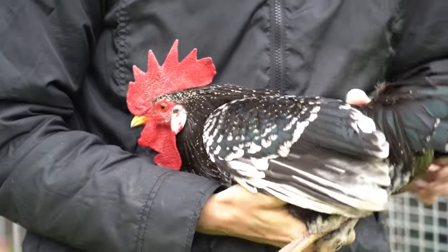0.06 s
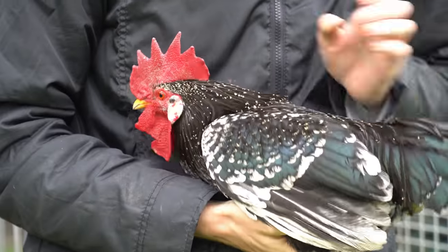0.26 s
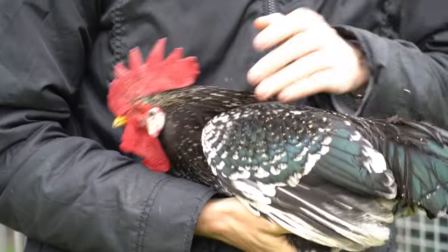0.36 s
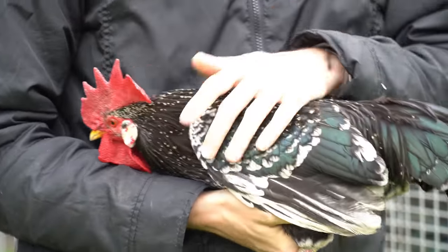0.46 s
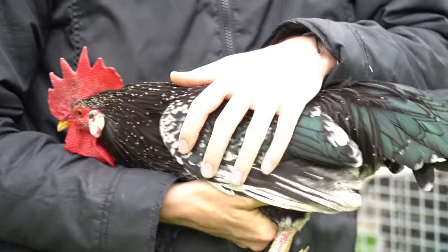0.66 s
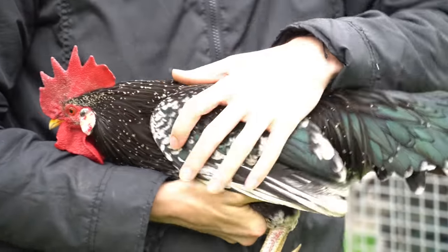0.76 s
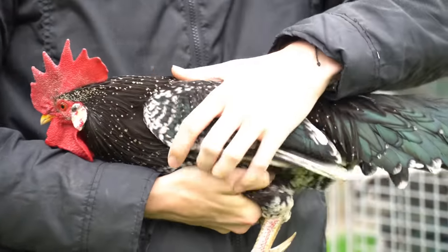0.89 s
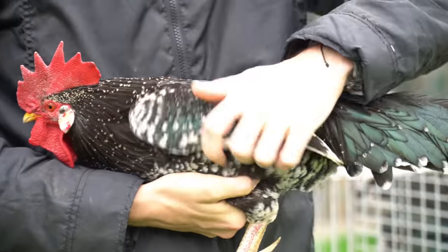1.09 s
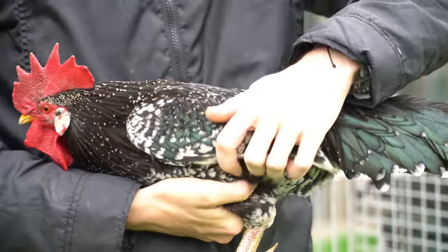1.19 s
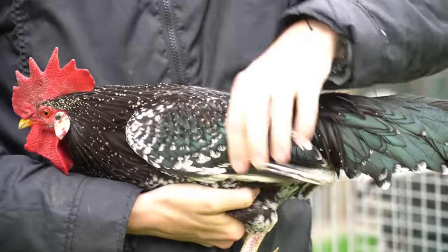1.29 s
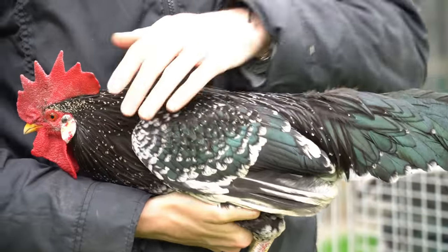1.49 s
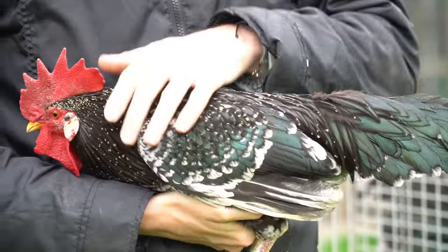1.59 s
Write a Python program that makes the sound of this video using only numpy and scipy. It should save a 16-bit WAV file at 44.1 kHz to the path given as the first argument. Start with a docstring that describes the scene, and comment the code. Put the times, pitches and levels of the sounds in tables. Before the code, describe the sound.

A held rooster crows once, close by: hoarse and quavering, then a clear falling whistle and gulp

```python
"""In a yard, a rooster crows once, close by on the left: a hoarse quavering first half, a clear falling
whistle, a few cracks along the way, and a gulp. Stacked sine overtones make the clear voice, irregular
pulses through throat resonances make the rasp, and short low sines the gulp. Fading noise echoes the crow.
The yard still rings from an earlier call (noise and a sine). A jacket rustles (noise), a hand pats feathers
(fading sines), small dry ticks sound (noise bursts) and faint air hisses behind it all."""
import sys
import numpy as np
from scipy import signal
from scipy.fft import rfft, irfft, next_fast_len
from scipy.io import wavfile
from scipy.ndimage import map_coordinates

SR = 44100
rng = np.random.default_rng(int(sys.argv[2]) if len(sys.argv) > 2 else 0)


def inscribe(sig):
    """Save sig as 16-bit PCM at rate SR to the path in sys.argv[1].

    A 1-D sig is mono; a 2-D sig holds one channel per row.
    Samples are clipped to [-1, 1] before scaling.
    """
    pcm = np.round(np.clip(np.atleast_2d(sig).T, -1, 1) * 32767)
    wavfile.write(sys.argv[1], SR, pcm.astype(np.int16))


N = 72765
T = np.arange(N) / SR

# The path of the crow, before quaver and cracks. Each row: time in seconds, pitch in Hz, quaver depth in Hz,
# tone in dB, rasp in dB, timbre (0 hoarse, 1 open, 2 pure; held at these ends), left over right in dB.
CROW_PATH = [(.188, 1295, 2.5, -52, -52, 0.08, 7), (.198, 1126, -4, -17.5, -21.5, 0.08, 13),
             (.225, 1091, 16.5, -21, -14.5, -0.5, 11.5), (.24, 1075, -15, -17.5, -19.5, 0.08, 15),
             (.252, 1107, 42, -16.5, -17.5, 0, 11), (.26, 1101, 19, -13, -27.5, -0.4, 11),
             (.32, 1107, 28, -14.5, -26, -0.5, 11.5), (.33, 1097, 8, -19, -15.5, -2, 11),
             (.37, 1099, -3, -17.5, -15.5, 0.08, 14.5), (.38, 1102, 27, -13, -26, 0, 13),
             (.415, 1169, 57, -11.5, -36, 0, 9.5), (.45, 1236, 75.5, -13, -27.5, 0.08, 14.5),
             (.54, 1242, 26.5, -13.5, -33, 0.2, 12), (.575, 1223, 95, -12.5, -25, 0.08, 15),
             (.6, 1147, 57, -12.5, -34, -0.2, 10.5), (.65, 1173, 86, -11, -26, 0.08, 12),
             (.68, 1129, 48, -12.5, -24.5, 0.1, 11.5), (.75, 1064, 69.5, -15, -26, 0, 13.5),
             (.8, 1024, 57, -19.5, -20.5, -0.9, 14.5), (.86, 1004, 4.5, -32, -18.5, 0.17, 15),
             (.884, 1012, 0, -27, -17, 0.8, 12), (.895, 1036, -0.5, -13.5, -24, 1.5, 13.5),
             (.93, 1043, -8.5, -10, -42.5, 1.23, 41), (.96, 1064, 0, -19.5, -38.5, 0.9, 15),
             (1.0, 1108, 4, -14.5, -43.5, 0.9, 15), (1.078, 1133, 1.5, -14.5, -41, 1, 9.5),
             (1.126, 1135, 3.5, -17, -32.5, 1.46, 12.5), (1.156, 1044, -0.5, -11, -44.5, 1.8, 15),
             (1.176, 1077, 5.5, -21.5, -32.5, 1, 7), (1.2, 1033, -1, -8.5, -40.5, 2.1, 16.5),
             (1.29, 1007, -1, -6.5, -52, 2.5, 15), (1.335, 988, 0, -8.5, -50, 2.05, 16),
             (1.38, 972, 0, -4.5, -46, 1.95, 15), (1.39, 950, 0, -10.5, -41, 1.92, 22),
             (1.405, 936.7, 0.5, -10.5, -27.5, 1.85, 19), (1.418, 930, 5.5, -14.5, -20, 1.75, 15.5),
             (1.425, 968, 15.5, -27.5, -39.5, 1.2, 4.5), (1.44, 869, -7, -35, -33, 0.6, 48),
             (1.45, 888, -3, -53.5, -60.5, -1.8, 43)]
# The tops of the quaver. Each entry: time in seconds.
QUAVER_TOPS = [.21, .235, .257, .279, .301, .322, .345, .375, .402, .425, .449, .473, .498, .526, .549,
               .573, .597, .621, .648, .676, .706, .742, .78, .815, .85]
# Cracks in the voice. Each row: time in seconds, added rasp in dB, pitch drop in Hz, tone dip in dB.
VOICE_CRACKS = [(0.482, -17.5, 2, 2.5), (0.515, -19.5, -0.5, 1), (0.661, -23, -1.5, 10),
                (0.691, -24.5, 6.5, 14.5), (0.73, -20.5, -0.5, 13), (0.766, -24.5, -3.5, 20),
                (1.021, -20, 43.5, 5), (1.04, -20.5, 32, 3.5), (1.082, -19, 72, 7),
                (1.129, -18.5, 42.5, 3.5)]
# Overtones of the three timbres. Each row: multiple of the pitch, relative level in dB.
HOARSE_OVERTONES = [(1, -8.5), (2, 1), (3, -20), (4, -11), (5, -14), (6, -15.5), (7, -20), (8, -40.5),
                    (9, -36)]
OPEN_OVERTONES = [(1, -15), (2, 0.5), (3, -26.5), (4, -25), (5, -29), (6, -46), (7, -54.5), (8, -50),
                  (9, -62.5), (10, -24.5), (11, -29), (12, -34), (13, -40), (14, -42)]
PURE_OVERTONES = [(1, -26), (2, -4), (3, -38), (4, -30), (5, -63), (6, -56.5), (7, -44.5), (8, -61),
                  (9, -61.5), (10, -50.5), (11, -45.5), (12, -39.5), (13, -35), (14, -47)]
LOST_DB = -42  # the hoarse voice loses its top overtones
HOARSE_ALL = HOARSE_OVERTONES + [(k, LOST_DB) for k, _ in OPEN_OVERTONES[len(HOARSE_OVERTONES):]]
# Fixed resonances that lift a passing overtone. Each row: centre in Hz, width in Hz, lift in dB.
OVERTONE_LIFTS = [(2750, 150, 4), (4400, 280, 9), (6900, 180, 7), (7750, 220, 10), (11200, 300, 8),
                  (12500, 300, 6)]
# Throat resonances of the rasp. Each row: centre in Hz, width in Hz, relative level in dB.
EARLY_THROAT = [(1033, 150, -1.5), (1940, 460, -2), (2207, 43.7, 13), (2740, 234, -0.5), (4270, 84, -2.5),
                (4650, 135, 1.5), (5440, 750, -7), (7740, 400, -3.5), (11300, 2000, -22.5),
                (13900, 1400, -33.5)]
LATE_THROAT = [(818, 104, 1.5), (1645, 360, -4), (2042, 140, 7), (2730, 170, 2.5), (4237, 65, 5),
               (4480, 270, -5.5), (6850, 390, -9), (12280, 670, -16.5)]
OPEN_THROAT = [(736.3, 74, -2), (1129, 47, 5), (1750, 240, 4.5), (2757, 68, 11), (3990, 90, -3.5),
               (12060, 670, -5.5)]
# Frequencies where the early, late and open rasp is faint. Each row: centre in Hz, width in Hz.
RASP_GAPS = [(9340, 1230), (9300, 3600), (8080, 9000)]
# When the throat changes, early to late and late to open. Each entry: time in seconds.
THROAT_TIMES = [.6, .8, .89, .93]
# Low grunts at the end. Each row: time in seconds, pitch in Hz, peak in dB, half length in seconds.
GULP_GRUNTS = [(1.414, 1169, -22, 0.003), (1.416, 785.6, -13.5, 0.0023), (1.43, 763, -21.5, 0.0052)]
# Tone colour on the right, added to the pan. Each row: frequency in Hz, level in dB.
RIGHT_TONE = [(300, 10), (700, 8.5), (1300, -1), (2200, 3.5), (5000, 0.5), (9000, 5), (14000, 12)]
# How far the left is ahead of the right. Each row: frequency in Hz, phase lead in radians.
LEFT_AHEAD = [(0, -4.5), (1210, 0.5), (2580, 10.5), (5000, 15), (8180, 17.5), (10700, 20), (15500, 19)]
# Echo of the yard. Each row: frequency in Hz, time to fall by 60 dB in seconds.
YARD_FADES = [(300, 0.41), (1000, 0.62), (2000, 0.77), (5000, 0.82), (12000, 0.14)]
# Loudness of the jacket rustle, before it flutters. Each row: time in seconds, level in dB.
RUSTLE_LEVEL = [(0, -49.5), (.17, -51), (.215, -38.5), (.29, -39), (.4, -45.5), (.45, -70), (1.65, -57.5)]
# Tone colour of the jacket cloth. Each row: frequency in Hz, relative level in dB per Hz.
CLOTH_TONE = [(30, -13), (110, -10), (250, -6.5), (450, 2.5), (800, -1.5), (3000, -2.5), (15000, -44.5)]
# Soft pats on feathers. Each row: start in seconds, pitch in Hz, level in dB before the fade.
FEATHER_PATS = [(.05, 278, -33.5), (.97, 300, -46), (1.477, 825, -31.5), (1.478, 266, -32)]
# Small dry ticks. Each row: start in seconds, centre in Hz, level in dB before the fade.
DRY_TICKS = [(0.233, 9150, -27.5), (1.463, 5500, -37), (1.565, 3820, -45)]
# Ringing of the earlier call. Each row: centre in Hz, width in Hz, relative level in dB.
EARLIER_RING = [(1010, 30, 1), (1740, 120, 0), (2066, 65, 5.5), (2850, 360, -5.5), (4500, 340, -14),
                (807, 67, -1.5)]
# Tone colour of the air. Each row: frequency in Hz, relative level in dB per Hz.
AIR_TONE = [(25, -19), (399, -18), (970, -3), (1340, -9), (1950, -33.5), (2420, -21), (8580, -30),
            (15500, -33)]

QUAVER_REF_HZ, DIP_DB, RASP_UP_DB = 60, 6, 4  # at this depth the troughs lose tone and gain rasp
CRACK_S, RECOVER_S = .0035, .016  # half length of a crack, and recovery time of its pitch
SHAKE_RATE, SMEAR_RATE = 150, 700  # random knots a second
# Largest roughness effects, reached when rasp equals tone: pitch shake, size shake,
# loss for each higher overtone, and phase smear (times the square of the multiple).
SHAKE_HZ, SHAKE_DB, BLUR_DB, SMEAR_RAD = 20, 5, 1.5, .04
BREAKUP_DB = .3  # size shake of the hoarse voice, times the multiple
RASP_HZ = 902.2  # the rasp's own pulse rate, near the windpipe note
RASP_JITTER, RASP_SIZE_DB = .2, 2  # scatter of its periods and pulse sizes
LOW_EDGE_HZ = 728  # the rasp thins out below this
YARD_DB = -23
NEAR_DB, NEAR_T60 = -17, .043  # a shorter echo, fading by 60 dB in this many seconds
PAT_T60, TICK_T60 = .047, .048  # seconds to fade by 60 dB
EARLIER_DB, EARLIER_T60 = -31, .52  # level at the start, seconds to fade by 60 dB
EARLIER_NOTE_HZ, EARLIER_NOTE_DB = 2060, -1.5  # note level is relative to EARLIER_DB
EARLIER_GAP_HZ = 3510
AIR_DB = -55
BASS_CUT_HZ, TOP_HZ = 58, 15850


def amp(db):
    """Turn dB into gain."""
    return 10 ** (np.asarray(db) / 20)


def unit(x):
    """Scale to an average strength (rms) of 1."""
    return x / np.sqrt(np.mean(x ** 2) + 1e-20)


def along(points, hz):
    """Read a curve of (Hz, value) points on a log frequency axis."""
    f, v = np.transpose(points)
    return np.interp(np.log(hz + 1), np.log(f + 1), v)


def curves(rows):
    """Draw each column after the time as a curve with one value per sample."""
    s, *cols = np.transpose(rows)
    return [np.interp(T, s, c) for c in cols]


def wobble(rate):
    """Make a smooth random curve with this many knots a second."""
    return map_coordinates(rng.standard_normal(N // 8), [T * rate])


def filtered(x, response):
    """Shape the spectrum of x with a complex response of frequency."""
    m = next_fast_len(N + SR // 2)
    return irfft(rfft(x, m) * response(np.fft.rfftfreq(m, 1 / SR)), m)[..., :N]


def resonances(rows):
    """Add up resonances that favour sound near their centres, with alternating signs."""
    def response(f):
        return sum((-1) ** k * amp(db) * 1j * f * w / (c * c - f * f + 1j * f * w)
                   for k, (c, w, db) in enumerate(rows))
    return response


def notch(hz, width_hz):
    """Give a notch, which removes sound around one frequency."""
    return lambda f: (hz * hz - f * f) / (hz * hz - f * f + 1j * f * width_hz)


def after(s, t60, attack):
    """Give a loudness curve that rises at s and dies away."""
    t = np.clip(T - s, 0, None)
    return amp(-60 * t / t60) * (1 - np.exp(-t / attack))


def hiss(spectrum, wide):
    """Make coloured stereo noise, nearly the same on both sides: a shared part plus a little difference."""
    mid, side = unit(filtered(rng.standard_normal((2, N)), lambda f: amp(along(spectrum, f))))
    return np.array([mid + wide * side, mid - wide * side])


def crow():
    """Join tone, rasp and gulp on a quavering, cracking pitch; returns voice and pan."""
    hz, depth, tone_db, rasp_db, timbre, pan_db = curves(CROW_PATH)
    quaver = np.cos(2 * np.pi * np.interp(T, QUAVER_TOPS, np.arange(len(QUAVER_TOPS))))
    trough = depth / QUAVER_REF_HZ * (1 - quaver) / 2
    hz = hz + depth * quaver
    tone_db = tone_db - DIP_DB * trough
    rasp_gain = amp(rasp_db + RASP_UP_DB * trough)
    for s, db, drop_hz, dip_db in VOICE_CRACKS:
        bump = np.exp(-.5 * ((T - s) / CRACK_S) ** 2)
        hz = hz - drop_hz * (T > s) * np.exp(-np.abs(T - s) / RECOVER_S)
        tone_db = tone_db - dip_db * bump
        rasp_gain = rasp_gain + amp(db) * bump
    rough = np.minimum(rasp_gain / amp(tone_db), 1)
    tone = np.sqrt(2) * amp(tone_db) * overtones(hz, timbre, rough)
    return tone + rasp_gain * rasp() + gulp(), pan_db


def overtones(hz, timbre, rough):
    """Stack sines at multiples of the pitch; roughness shakes their pitch, size and phase."""
    cycles = np.cumsum(hz + SHAKE_HZ * np.sqrt(rough) * wobble(SHAKE_RATE)) / SR
    tone = 0
    for (k, hoarse), (_, opened), (_, pure) in zip(HOARSE_ALL, OPEN_OVERTONES, PURE_OVERTONES):
        db = np.interp(timbre, np.arange(3), [hoarse, opened, pure])
        db = db + sum(lift * np.exp(-.5 * ((k * hz - c) / w) ** 2) for c, w, lift in OVERTONE_LIFTS)
        db = db + BREAKUP_DB * k * np.clip(1 - timbre, 0, 1) * wobble(SHAKE_RATE)
        db = db + rough * (SHAKE_DB * wobble(SHAKE_RATE) - BLUR_DB * k)
        smear = SMEAR_RAD * k * k * rough * wobble(SMEAR_RATE)
        tone = tone + amp(db) * np.sin(2 * np.pi * (k * cycles + rng.random()) + smear)
    return tone


def rasp():
    """Send irregular pulses through a throat that changes its resonances from early to late to open."""
    chance = rng.standard_normal((N // 20, 2))
    at = np.cumsum(SR / RASP_HZ * np.exp(RASP_JITTER * chance[:, 0])).astype(int)
    pulses = np.bincount(at, amp(RASP_SIZE_DB * chance[:, 1]), N)[:N]

    def low_edge(f):
        steep = (f / LOW_EDGE_HZ) ** 4
        return (1j * f / (LOW_EDGE_HZ + 1j * f)) ** 2 * steep / (1 + steep)

    shape = np.interp(T, THROAT_TIMES, [.074, .62, 1, 2])  # 0 early, 1 late, 2 open
    throats = (EARLY_THROAT, LATE_THROAT, OPEN_THROAT)
    total = 0
    for k, (rows, gap) in enumerate(zip(throats, RASP_GAPS)):
        sound = filtered(pulses, lambda f: resonances(rows)(f) * notch(*gap)(f) * low_edge(f))
        share = np.sqrt(np.clip(1 - np.abs(shape - k), 0, 1))
        total = total + share * unit(sound)
    return total


def gulp():
    """Make short low grunts, each a sine that swells and fades in a bell shape."""
    return sum(amp(db) * np.exp(-.5 * ((T - s) / half) ** 2) * np.sin(2 * np.pi * hz * T)
               for s, hz, db, half in GULP_GRUNTS)


def echo(x, decay):
    """Spread x over a stereo noise tail in which each frequency dies at its own speed."""
    hz, t, z = signal.stft(rng.standard_normal((2, SR)), SR, nperseg=256)
    fade = amp(-60 * t / along(decay, hz)[:, None])
    tail = signal.istft(z * fade, SR, nperseg=256)[1]
    delayed = np.pad(x, (300, 0))[None]  # samples of silence before the echo
    return signal.fftconvolve(delayed, tail / np.linalg.norm(tail[0]), axes=1)[:, :N]


def jacket_rustle():
    """Rub cloth: coloured noise with a fluttering loudness."""
    return amp(curves(RUSTLE_LEVEL)[0] + 3.8 * wobble(28.85)) * hiss(CLOTH_TONE, wide=.084)


def feather_pats():
    """Pat feathers softly: each pat is a sine that dies away fast."""
    return sum(amp(db) * after(s, PAT_T60, .0047) * np.sin(2 * np.pi * hz * (T - s))
               for s, hz, db in FEATHER_PATS)


def dry_ticks():
    """Make small ticks from noise around one frequency, with a sharp start and a fast fade."""
    total = 0
    for s, hz, db in DRY_TICKS:
        noise = filtered(rng.standard_normal(N), lambda f: resonances([(hz, .6 * hz, 0)])(f) ** 2)
        total = total + amp(db) * unit(noise) * after(s, TICK_T60, .00032)
    return total


def earlier_call():
    """Let the partials of the call before die away as resonant noise, its main note steadiest."""
    def colour(f):
        slope = f / (f + 2000) / (1 + (f / 6000) ** 2)
        return resonances(EARLIER_RING)(f) * notch(EARLIER_GAP_HZ, 1500)(f) * slope

    ring = unit(filtered(rng.standard_normal((2, N)), colour))
    note = amp(EARLIER_NOTE_DB + 1.5 * wobble(49)) * np.sin(2 * np.pi * EARLIER_NOTE_HZ * T)
    # a little of each side's ringing also reaches the other
    return amp(EARLIER_DB - 60 * T / EARLIER_T60) * (ring + .18 * ring[::-1] + note)


def air():
    """Make the faint steady background from coloured noise."""
    return amp(AIR_DB) * hiss(AIR_TONE, wide=.3)


def scene():
    """Mix all sources; the voice gets its own level, colour and phase on the right."""
    voice, pan_db = crow()
    right = filtered(voice * amp(-pan_db),
                     lambda f: amp(along(RIGHT_TONE, f)) * np.exp(-1j * along(LEFT_AHEAD, f)))
    room = amp(YARD_DB) * echo(voice, YARD_FADES) + amp(NEAR_DB) * echo(voice, [(100, NEAR_T60)])
    handling = jacket_rustle() + feather_pats() + dry_ticks()
    return np.array([voice, right]) + room + handling + earlier_call() + air()


def record(dry):
    """Weaken the deep bass and keep nothing from the band limit upward."""
    return filtered(dry, lambda hz: (hz < TOP_HZ) * hz ** 2 / (hz ** 2 + BASS_CUT_HZ ** 2))


dry = scene()
out = record(dry)
inscribe(out)
```